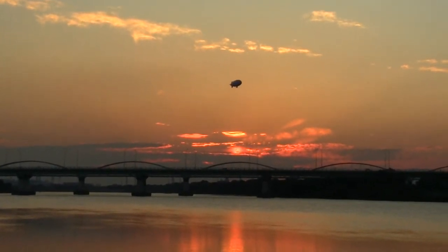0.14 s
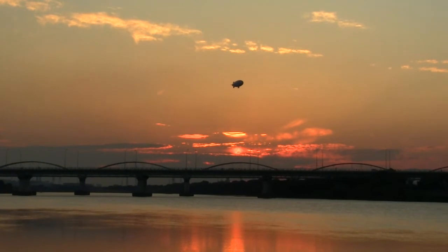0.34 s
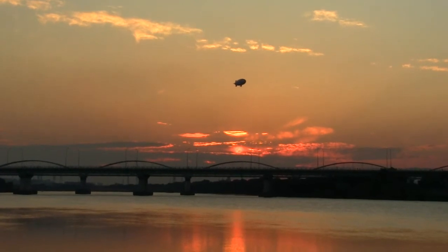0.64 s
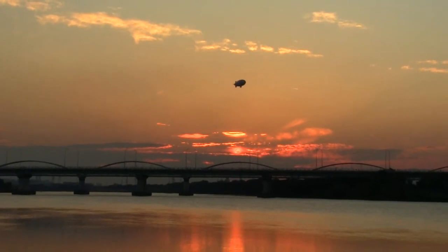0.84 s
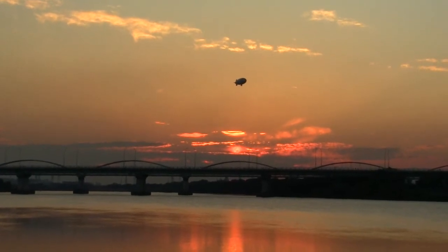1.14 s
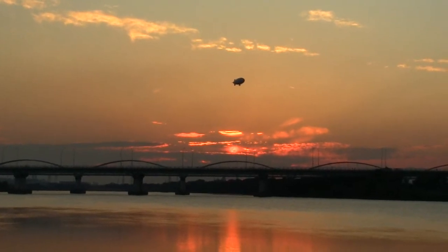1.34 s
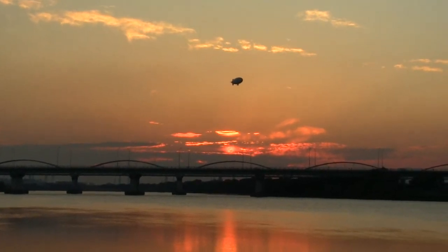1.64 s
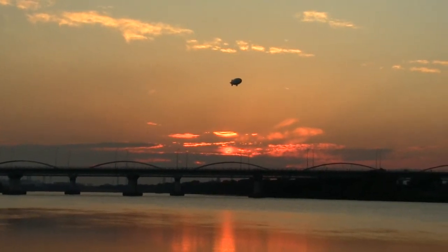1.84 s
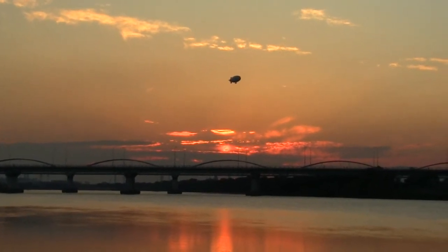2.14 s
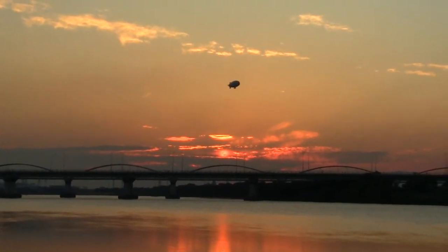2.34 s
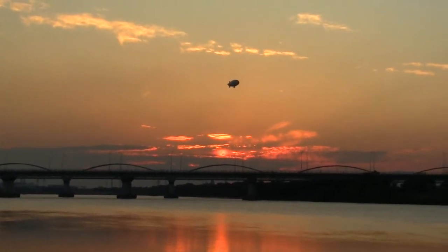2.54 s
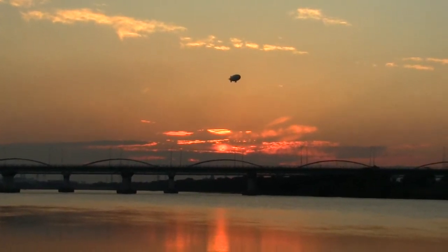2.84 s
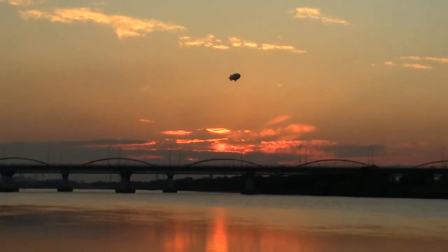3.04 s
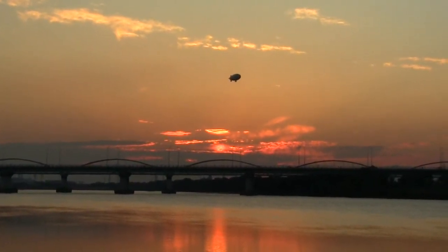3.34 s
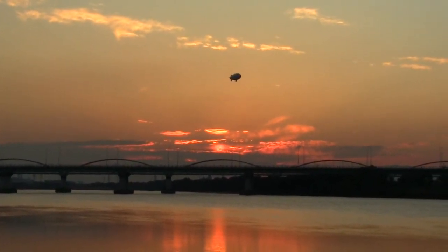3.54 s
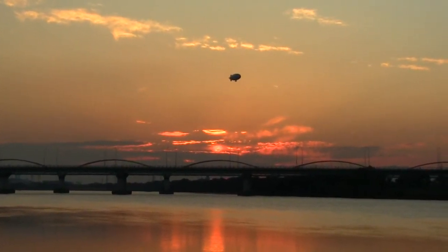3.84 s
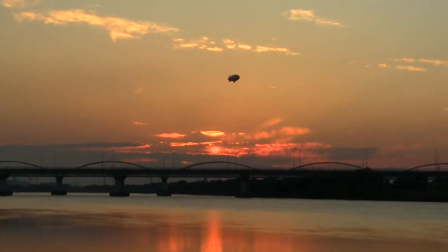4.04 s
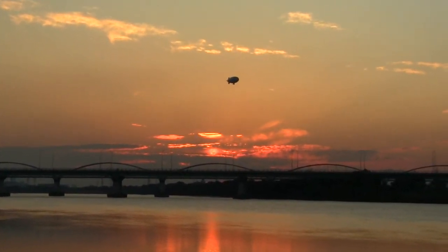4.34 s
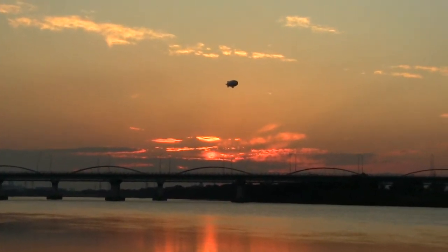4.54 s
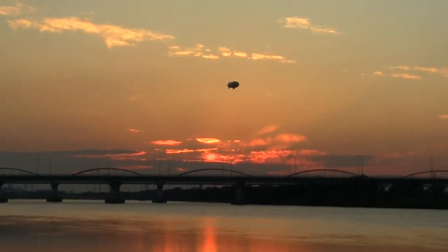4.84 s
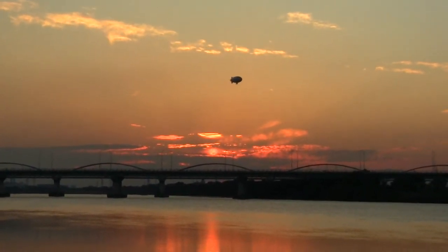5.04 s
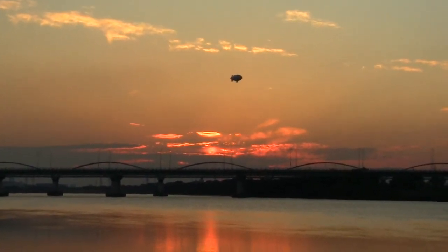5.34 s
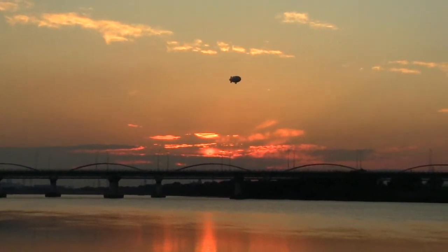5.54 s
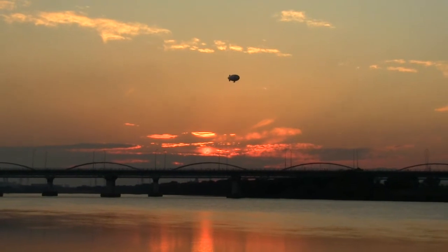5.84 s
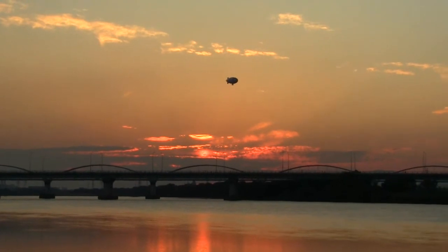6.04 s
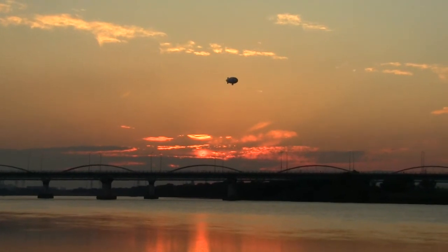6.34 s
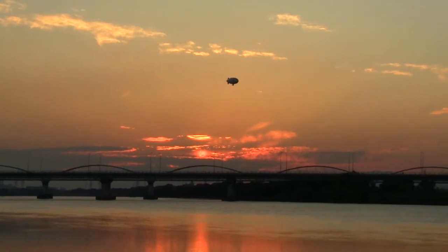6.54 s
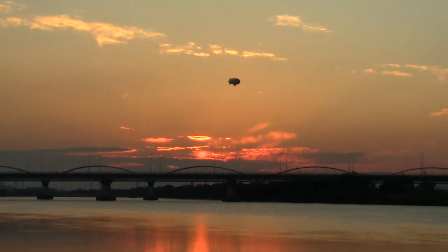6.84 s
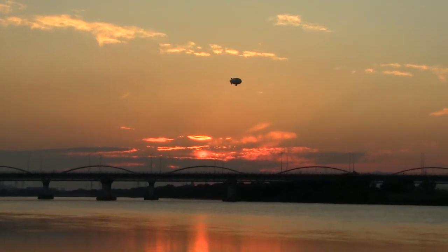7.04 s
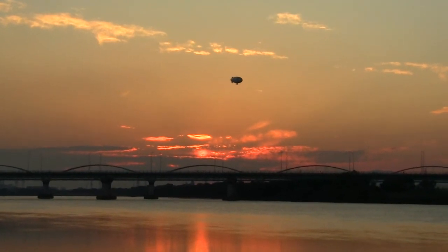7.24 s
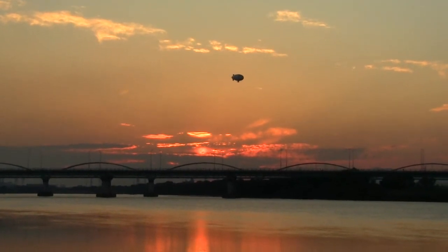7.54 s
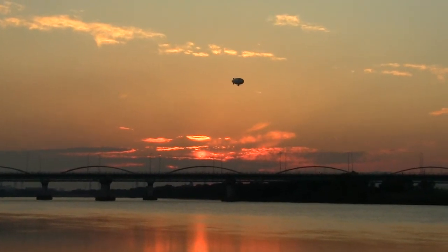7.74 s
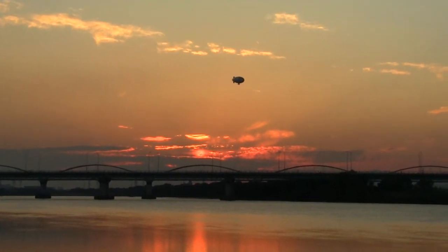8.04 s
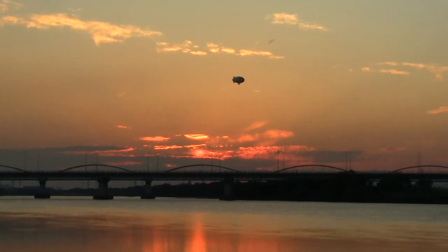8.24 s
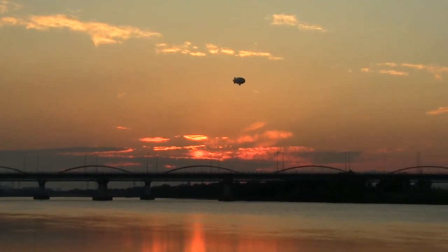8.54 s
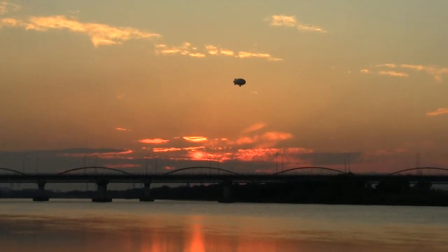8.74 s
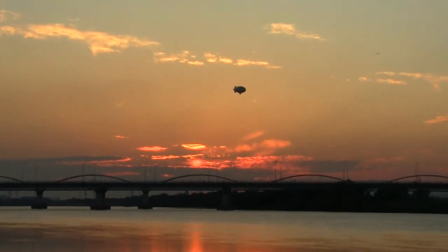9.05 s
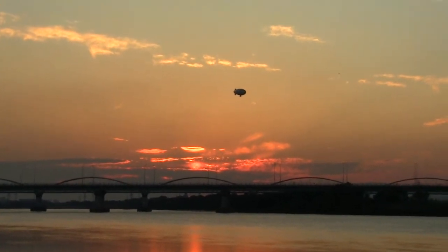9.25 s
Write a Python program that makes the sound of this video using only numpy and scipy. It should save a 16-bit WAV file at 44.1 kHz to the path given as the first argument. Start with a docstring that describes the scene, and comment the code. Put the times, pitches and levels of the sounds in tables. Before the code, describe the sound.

Field crickets chirp brightly close by on a river bank at dusk, over ringing distant insect chorus and low, faint traffic rumble.

```python
"""A river bank at dusk: field crickets chirp close by near 5.5 kHz, tree crickets trill near 3.8 kHz, another insect rasps.
Behind them a far chorus rings without a break, over the low rumble and engine hum of traffic across the water.
Each near stroke is a gliding tone under a pressure envelope; the chorus sums many such tones out of step.
Shaped noise makes the traffic, the air, a faint hiss and a low bump; sines make the engine and a far whine."""
import sys
import numpy as np
from scipy import signal
from scipy.fft import rfft, irfft
from scipy.io import wavfile

SR = 44100
rng = np.random.default_rng(int(sys.argv[2]) if len(sys.argv) > 2 else 0)


def inscribe(sig):
    """Save sig as 16-bit PCM at rate SR to the path in sys.argv[1].

    A 1-D sig is mono; a 2-D sig holds one channel per row.
    Samples are clipped to [-1, 1] before scaling.
    """
    pcm = np.round(np.clip(np.atleast_2d(sig).T, -1, 1) * 32767)
    wavfile.write(sys.argv[1], SR, pcm.astype(np.int16))


N = 413658
TIME = np.arange(N) / SR   # s
HZ_PER_DB = 11   # a harder field cricket stroke is also higher in pitch
RASP_PERIOD_S = .1334
CUTOFF_HZ = 13650

# Voices of five field crickets, by name: (starting pitch at peak effort [Hz], stroke length [s], steady fall [Hz],
# last droop [Hz], rise [s], stroke period [s], head start of the lead-in stroke [s],
# peak level before a common gain [dB], swell from stroke to stroke [dB])
FIELD_VOICES = { "lowest": (5225, .051, 70, 60, .008, .061, .15, -20.5, 1.2),
                "low": (5305, .052, 55, 50, .008, .0665, .15, -21.0, 1.5),
                "middle": (5570, .053, 72, 90, .009, .0615, .132, -19.2, 1.5),
                "nearest": (5690, .06, 125, 220, .0065, .0638, .16, -18.0, -.3),
                "highest": (5808, .055, 205, 120, .008, .063, .137, -19.2, 1.0)}
# Chirps of each field cricket, a lone lead-in stroke and then three in a row:
# (time of the first of the three [s], level of the lead-in against the peak [dB])
FIELD_CHIRPS = { "lowest": [(.322, -8), (2.087, -9), (2.628, -7), (4.273, -10), (4.832, -8), (6.606, -10),
                (7.206, -8), (9.36, -10)], "low": [(.942, -6), (2.299, -9), (2.866, -9), (3.448, -4),
                (4.863, -9), (5.43, -6), (6.926, -8), (7.503, -8), (9.353, -10)], "middle": [(-.087, -9),
                (1.04, -1.5), (2.175, -8), (2.849, -12), (3.958, -9), (4.654, -10), (5.925, -4),
                (6.478, -10), (8.39, -12)], "nearest": [(.038, -5), (.613, -3), (1.501, -4), (2.1, -1),
                (3.327, -5.5), (3.915, -.5), (5.095, -9), (5.679, -2), (6.226, -.5), (7.179, -8),
                (7.755, -3), (8.351, -1)], "highest": [(.333, -12), (.936, -10), (1.548, -7), (2.265, -8),
                (2.795, -2), (3.435, -6), (3.997, -3), (4.535, -2.5), (5.162, -6), (5.726, -3), (6.326, -6),
                (7.002, -6), (7.696, -6), (8.32, -9), (8.929, -6)]}
# Faint inharmonic tones at fixed shifts from the chirps, some gliding in mirror image:
# (frequency shift [Hz], level against the chirp [dB]); a shift far below zero mirrors the glide
TONE_SHIFTS = [(-3900, -38.5), (3900.5, -33.5), (6874, -41), (7801, -47.5), (-15480, -40), (-16600, -39),
               (-17000, -52)]
# Voices of three tree crickets, by name: (starting pitch [Hz], stroke length [s], steady fall [Hz],
# last droop [Hz], stroke period [s], swell over a trill [dB])
TREE_VOICES = { "quick": (3865, .039, 315, 30, .0461, 1), "slow": (3965, .048, 470, 40, .0683, 4),
               "high": (4190, .048, 640, 60, .0705, 10)}
# Trills of each tree cricket: (time [s], wing strokes [count], peak level before a common gain [dB])
TREE_TRILLS = { "quick": [(-.012, 3, -28), (.172, 5, -28), (.445, 3, -28), (.9, 5, -34), (1.378, 7, -28.5),
               (1.735, 2, -26), (1.856, 3, -27), (2.047, 4, -32), (2.58, 11, -30), (3.144, 3, -27.5),
               (3.331, 2, -28.5), (3.888, 3, -32), (4.064, 6, -28), (4.387, 6, -29), (4.724, 2, -28),
               (5.291, 6, -29), (5.618, 5, -29), (5.901, 8, -31), (6.981, 3, -30), (7.164, 9, -29),
               (7.631, 2, -28), (8.324, 8, -30.5), (8.748, 6, -30), (9.071, 2, -28), (9.213, 3, -29)],
               "slow": [(.948, 6, -26.5), (2.168, 6, -26.5), (3.454, 6, -25), (4.849, 6, -25.5),
               (6.284, 10, -26.5), (7.756, 8, -26)], "high": [(.624, 5, -35), (5.712, 5, -24.5)]}
# Bouts of rasping: (time [s], rasps [count], level before a common gain [dB])
RASPING = [(.056, 4, -40.5), (1.5, 10, -40), (4.089, 11, -39.8), (6.588, 9, -39.2), (8.828, 4, -39.5)]
# Far choruses: (pitch at mid-stroke [Hz], largest offset of a singer [Hz], fall in a stroke [Hz],
# nominal stroke rate [1/s], rms level [dB])
FAR_GROUPS = [(3236, 52, 275, 43, -33.2), (3690, 170, 403, 19, -43), (5740, 110, 195, 15.5, -39.7),
              (5220, 260, 314, 17, -45.3)]
# Spectral shape of traffic and air, before a common gain: (frequency [Hz], relative density [dB])
AIR_SPECTRUM = [(20, -19), (50, -1), (75, -1), (125, -0.5), (200, -5), (400, -4.5), (800, -8.5),
                (1600, -15), (2100, -12.5), (2550, -6), (3100, -7), (4300, -14), (4900, -9), (6500, -12),
                (7700, -19.5), (8400, -31.5), (13500, -28.5)]
# Stereo width of traffic and air: (frequency [Hz], side against middle [dB])
AIR_WIDTH = [(30, -35), (70, -28), (160, -22), (350, -18), (700, -21), (1400, -30), (3000, -42),
             (9000, -42)]
# Course of the traffic rumble, used relative to its mean: (time [s], level [dB])
TRAFFIC_COURSE = [(0.0, -46.5), (0.78, -45.5), (9.38, -49)]
# A far engine before fading: (time [s], rms level of the 2nd, 3rd and 4th multiple of the firing rate [dB each])
ENGINE_ORDERS = [(0, -51.5, -60, -55), (2, -54.5, -62, -54.5), (3.1, -57, -57.5, -56),
                 (4.5, -57.5, -56, -61.5), (6.2, -52, -61.5, -69), (7.2, -54.5, -62, -63),
                 (8.3, -57, -66, -55), (9.38, -58, -62, -57.5)]
# A far whine, perhaps of tyres on the bridge, before wavering: (time [s], pitch [Hz], rms level [dB])
WHINE_COURSE = [(0, 463, -56.5), (1.2, 474, -55), (1.6, 471.8, -51.5), (2.15, 476, -51), (2.4, 468, -58),
                (4.6, 468, -67), (5.3, 471, -56), (5.8, 478, -72), (9.38, 468, -80)]
# A soft low bump: (time [s], level [dB])
BUMP_COURSE = [(9.0, -87), (9.17, -47), (9.26, -54), (9.37, -71)]


def from_db(db):
    """The decibel is logarithmic: 20 dB is a tenfold amplitude gain."""
    return np.exp(np.asarray(db) * (np.log(10) / 20))


def rms_one(x):
    """Root-mean-square normalization gives a signal unit power."""
    return x / np.sqrt(np.mean(np.abs(x) ** 2) + 1e-20)


def in_time(rows):
    """Linear interpolation carries each column of a time curve to every sample."""
    s, *columns = np.transpose(rows)
    return [np.interp(TIME, s, column) for column in columns]


def at_hz(points, hz):
    """Spectral levels are interpolated on a logarithmic frequency axis."""
    point_hz, point_db = np.transpose(points)
    return np.interp(np.log(hz + 1e-9), np.log(point_hz), point_db)


def drift(rate, t=TIME):
    """Interpolated chance: unit-rms fluctuation through `rate` random values a second, read at the times t."""
    knots = rng.standard_normal(int(N / SR * rate) + 2)
    return rms_one(np.interp(t * rate, np.arange(len(knots)), knots))


def band_noise(low_hz, high_hz):
    """Filtered white noise keeps its power mostly near the passband."""
    band = signal.butter(2, [low_hz, high_hz], "band", fs=SR, output="sos")
    return signal.sosfilt(band, rng.standard_normal(N))


def add(track, s, sound):
    """Superposition: a sound starting at time s adds to the pressure already there."""
    at = int(round(s * SR))
    lo, hi = max(at, 0), min(at + len(sound), N)
    if hi > lo:
        track[lo:hi] += sound[lo - at:hi - at]


def stroke(pitch_hz, length, fall_hz, droop_hz):
    """Stridulation: as the wings close the scraper slows along the file, so the tone sinks; gives progress 0-1, tone."""
    u = np.linspace(0, 1, max(int(length * SR), 2))
    hz = pitch_hz - fall_hz * u - droop_hz * u ** 6
    return u, np.exp(2j * np.pi * np.cumsum(hz) / SR)


def field_crickets(fade=3.53, uneven=0.18, tooth_db=1.0, level_db=0.5, uneven_db=.4):
    """Amplitude envelope: each stroke bites, then fades as the wings close; uneven teeth roughen it a little."""
    out = np.zeros(N, complex)
    for singer, voice in FIELD_VOICES.items():
        pitch_hz, length, fall_hz, droop_hz, rise, period, head_start, peak_db, swell_db = voice
        for s, lead_db in FIELD_CHIRPS[singer]:
            for delay, effort_db in chirp(period, head_start, lead_db, swell_db):
                bite, release = np.exp(uneven * rng.standard_normal(2))
                effort_db = effort_db + uneven_db * rng.normal()
                u, tone = stroke(pitch_hz + HZ_PER_DB * effort_db, length, fall_hz, droop_hz)
                onset = np.tanh(u * length / (rise * bite))
                pressure = onset * (1 - u ** (fade * release))
                add(out, s + delay - rise / 2, from_db(peak_db + effort_db) * pressure * tone)
    return out * from_db(level_db + tooth_db * drift(400))


def chirp(period, head_start, lead_db, swell_db):
    """Rhythmic grouping: a lead-in stroke, a pause, then three in even level steps; (delay [s], level [dB])."""
    return [(-head_start, lead_db), (0, -2 * swell_db), (period, -swell_db), (2 * period, 0)]


def shifted_copies_and_octave(song, octave_db=-42):
    """Frequency shift and phase doubling: faint inharmonic copies and a weak octave are computed from the chirps."""
    copies = sum(from_db(db) * song * np.exp(2j * np.pi * shift_hz * TIME) for shift_hz, db in TONE_SHIFTS)
    octave = song * np.exp(1j * np.angle(song))   # doubles the phase, keeps the envelope
    return (copies + from_db(octave_db) * octave).real


def tree_crickets(uneven_db=1.4, uneven_hz=16, level_db=1.3, roundness=0.65):
    """Repeated frequency glides: rounded strokes fall steeply, and a trill starts softly and swells."""
    out = np.zeros(N)
    for singer, (pitch_hz, length, fall_hz, droop_hz, period, swell_db) in TREE_VOICES.items():
        for s, strokes, peak_db in TREE_TRILLS[singer]:
            for k, (loud, sharp) in enumerate(rng.standard_normal((round(strokes), 2))):
                u, tone = stroke(pitch_hz + uneven_hz * sharp, length, fall_hz, droop_hz)
                softness_db = swell_db * (1 - k / strokes) ** 2
                db = peak_db + level_db - softness_db + uneven_db * loud
                pressure = np.abs(np.sin(np.pi * u)) ** roundness
                add(out, s + k * period, from_db(db) * pressure * tone.real)
    return out


def rasps(level_db=8, first_db=-3, jitter_s=.003):
    """Near-periodic pulse groups: rasps keep a steady pace within a bout, the first one softer."""
    out = np.zeros(N)
    for s, repeats, db in RASPING:
        for k in range(round(repeats)):
            start = s + k * RASP_PERIOD_S + jitter_s * rng.normal()
            gain = from_db(db + level_db + first_db * (k == 0))
            for delay, sound in rasp_strokes():
                add(out, start + delay, gain * sound)
    return out


def rasp_strokes(pitch_hz=5600, fall_hz=1150, uneven_hz=70, length=.0125, period=.0135, count=4):
    """Rapid pulses heard as one rasp: steep strokes peak just before mid-length; gives (delay [s], sound)."""
    for k, (loud, sharp) in enumerate(rng.standard_normal((count, 2))):
        u, tone = stroke(pitch_hz + uneven_hz * sharp, length, fall_hz, 0)
        yield k * period, from_db(loud) * np.sin(np.pi * u ** .8) * tone.real


def far_chorus(wander_hz=42, swell_db=2.0, count=6, size=16):
    """Incoherent superposition: singers of differing pitch and tempo, with varying strokes, blur into a ringing."""
    out = np.zeros(N)
    t = TIME[::size]   # pitch and pressure are computed once per `size` samples
    for pitch_hz, spread_hz, fall_hz, per_s, db in FAR_GROUPS:
        group = np.zeros(N)
        for place in np.linspace(-1, 1, count):
            tempo = per_s * (1 + .04 * rng.normal() + .04 * drift(3, t))
            u = (rng.random() + np.cumsum(tempo) * size / SR) % 1   # progress through each stroke
            singer_hz = pitch_hz + spread_hz * place * abs(place)
            hz = singer_hz + wander_hz * drift(per_s, t) + fall_hz * (.5 - u)
            pressure = np.sin(np.pi * u) ** 2 * from_db(swell_db * drift(4.3, t))
            phase = np.cumsum(np.repeat(2 * np.pi * hz / SR, size)[:N])
            group += np.interp(TIME, t, pressure) * np.sin(phase)
        out += from_db(db) * rms_one(group)
    return out


def bank_scatter(x, t60=0.28):
    """Diffuse reflection: grass and the embankment return a tail that decays by 60 dB in t60 seconds."""
    t = TIME[:SR // 2]
    tail = rng.standard_normal(len(t)) * from_db(-60 * t / t60) * (t > .004)
    return signal.fftconvolve(x, tail / np.linalg.norm(tail))[:N]


def high_sizzle(low_hz=6300, high_hz=7600, level_db=-55, flicker_db=4):
    """Modulated band noise: a faint hiss, probably far bush crickets, comes and goes above the chirps."""
    return from_db(level_db) * rms_one(band_noise(low_hz, high_hz) * from_db(flicker_db * drift(16)))


def traffic_and_air(level_db=-41.0, rumble_edge_hz=900):
    """Spectral shaping of nearly mono noise: its low part rises and falls with the traffic."""
    hz = np.arange(N // 2 + 1) * SR / N
    shape = from_db(at_hz(AIR_SPECTRUM, hz)) * np.minimum(hz / 20, 1)
    mid, side = rfft(rng.standard_normal((2, N))) * shape
    left_right = mid + from_db(at_hz(AIR_WIDTH, hz)) * side * [[1], [-1]]
    air = rms_one(irfft(left_right, N))
    rumble = signal.sosfilt(signal.butter(1, rumble_edge_hz, fs=SR, output="sos"), air)
    traffic_db, = in_time(TRAFFIC_COURSE)
    rumble_gain = from_db(traffic_db - traffic_db.mean())
    return from_db(level_db) * (air + rumble * (rumble_gain - 1))


def far_hum(firing_hz=70.63, fading_db=2.0, waver=0.0062):
    """Harmonic series: engine orders, with a separate whine, fade in and out on their way across the water."""
    turn = 2 * np.pi * np.cumsum(firing_hz * (1 + waver * drift(5))) / SR
    engine = np.zeros(N)
    for order, db in enumerate(in_time(ENGINE_ORDERS), 2):
        engine += from_db(db + fading_db * drift(3.9)) * np.sin(order * turn)
    whine_hz, whine_db = in_time(WHINE_COURSE)
    whine_phase = 2 * np.pi * np.cumsum(whine_hz + 2 * drift(27)) / SR
    whine = from_db(whine_db + 2 * drift(8)) * np.sin(whine_phase)
    return np.sqrt(2) * (engine + whine)   # rms levels to sine peaks


def low_bump(low_hz=40, high_hz=85):
    """Band noise under a level envelope: a brief swell of deep sound."""
    bump_db, = in_time(BUMP_COURSE)
    return from_db(bump_db) * rms_one(band_noise(low_hz, high_hz))


def scene(near_wet_db=-18, far_wet_db=-13):
    """Direct and scattered sound add: near singers are almost dry, far ones more scattered, all in the middle."""
    song, chorus = field_crickets(), far_chorus()
    near = song.real + shifted_copies_and_octave(song) + tree_crickets() + rasps()
    scattered = bank_scatter(from_db(near_wet_db) * near + from_db(far_wet_db) * chorus)
    return near + chorus + scattered + high_sizzle() + traffic_and_air() + far_hum() + low_bump()


def record(dry):
    """Band limitation: an elliptic low-pass cuts the top steeply."""
    return signal.sosfilt(signal.ellip(10, .1, 80, CUTOFF_HZ, fs=SR, output="sos"), dry)


dry = scene()
out = record(dry)
inscribe(out)
```